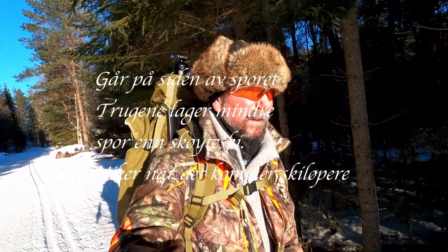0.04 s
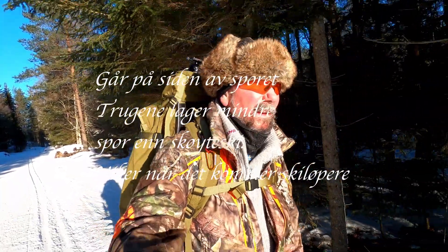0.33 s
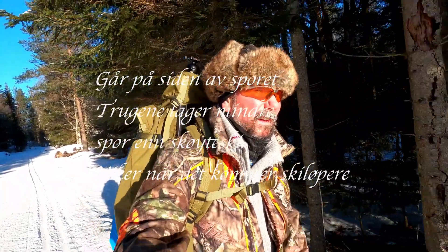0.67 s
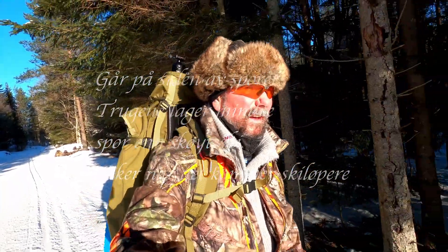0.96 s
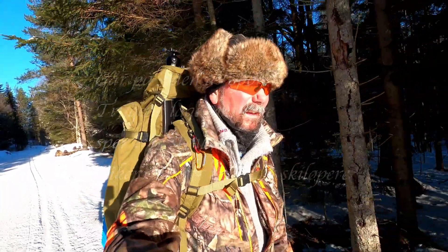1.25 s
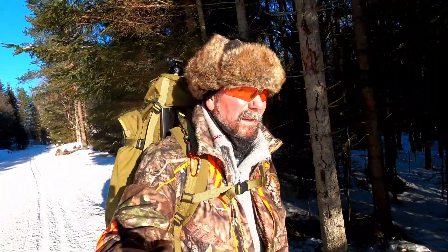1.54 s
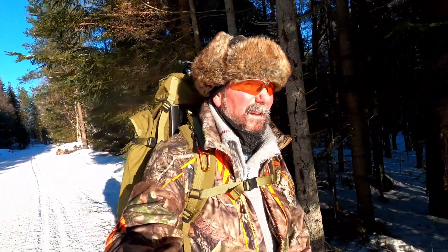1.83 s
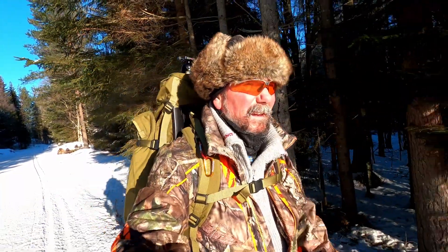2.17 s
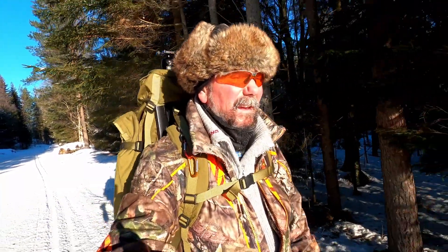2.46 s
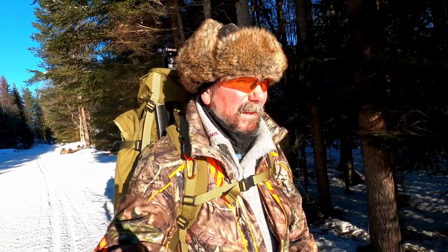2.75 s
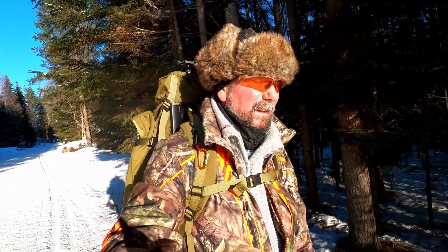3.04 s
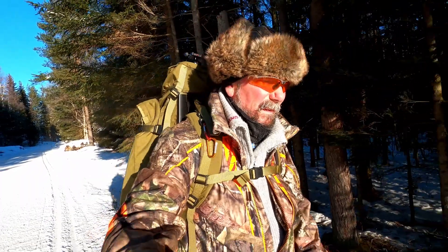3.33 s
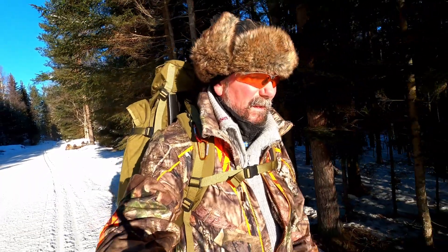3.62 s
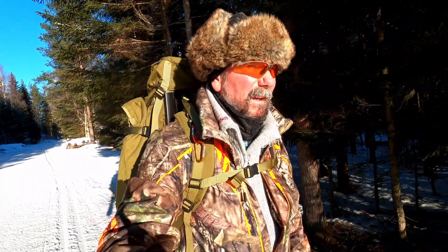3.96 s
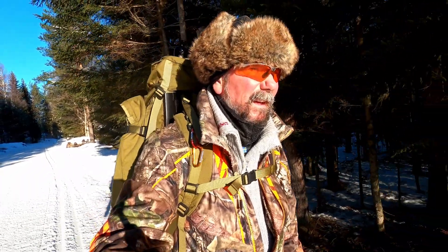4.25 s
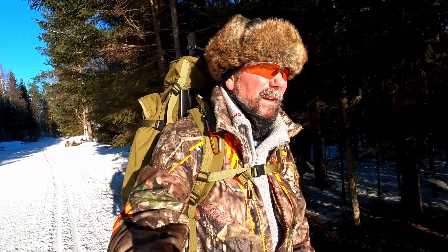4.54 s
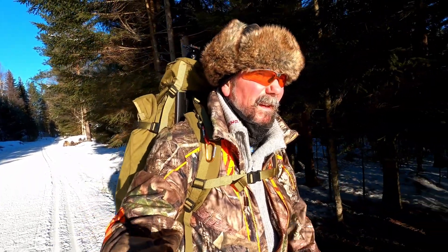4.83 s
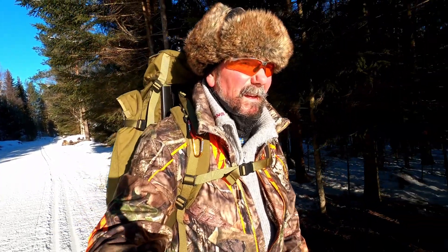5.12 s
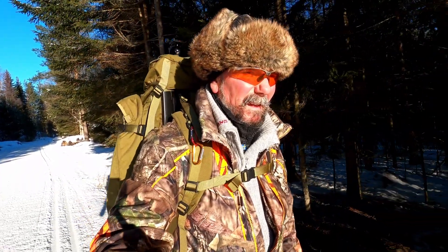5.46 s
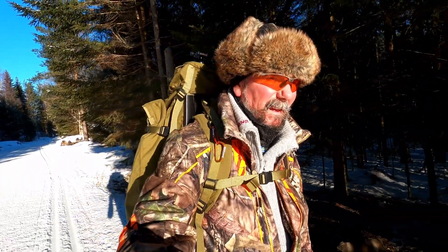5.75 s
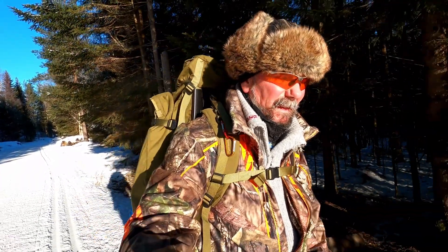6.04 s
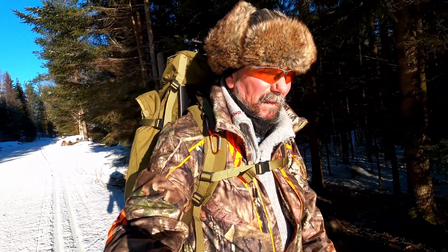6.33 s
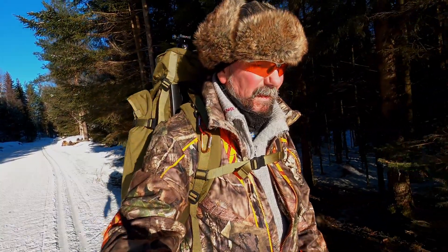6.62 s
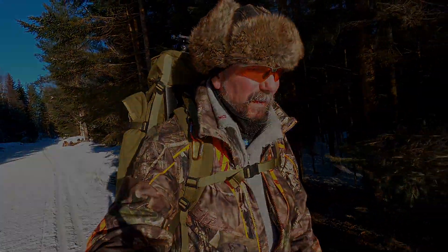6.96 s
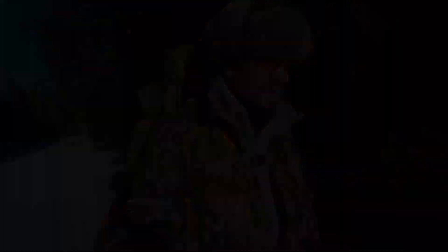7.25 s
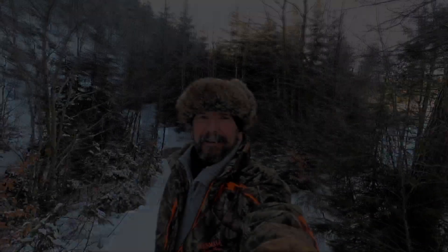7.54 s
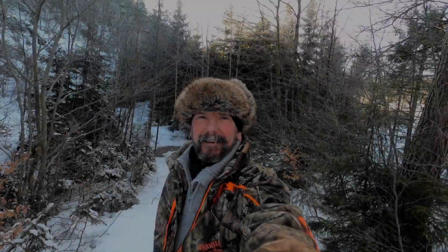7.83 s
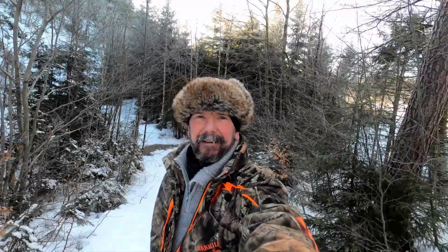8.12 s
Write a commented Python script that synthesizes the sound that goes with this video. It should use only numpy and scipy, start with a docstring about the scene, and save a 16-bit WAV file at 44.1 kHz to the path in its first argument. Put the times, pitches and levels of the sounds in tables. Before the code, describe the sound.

From the start, snowshoes walk over crusted snow in a still forest, about an arm's length below the microphone, with no echo. The steps are even, about one every 0.7 seconds. Each scrapes forward with an icy rasp, snaps the crust, then crushes the snow with a duller crunch that briefly rings the snowshoe frame. Lighter scuffs and brittle ticks fall between the steps. A metal binding clinks lightly at about 0.6, 0.7 and 5 seconds. Powder swishes faintly near 1.3 and 4.7 seconds, and the crust gives short, hollow creaks around 1.5, 2.4, 3.8 and 6.5 seconds. Soft, low puffs of air bump the microphone in the first three seconds and again from about 5.7 to 7.1 seconds. At about 7.4 seconds the walking cuts off abruptly, leaving only a very faint forest hush until the end at around 8 seconds.

```python
"""In the faint hush of a still forest, snowshoes walk on crusted snow an arm's length below a microphone. Each
shoe first scrapes forward and cracks the crust, then crushes the snow as the walker's weight comes on; these
brittle fractures set its frame ringing briefly. Along the way puffs of air bump the microphone, a binding
clinks, a sleeve swishes and slabs of crust croak over softer snow. After about 7.4 s the walk cuts off abruptly
and only the hush remains."""
import sys
import numpy as np
from scipy import signal
from scipy.fft import rfft, irfft
from scipy.io import wavfile
from scipy.ndimage import uniform_filter1d

SR = 44100
rng = np.random.default_rng(int(sys.argv[2]) if len(sys.argv) > 2 else 0)


def transcribe(u):
    """Save the signal u as a 16-bit wav file named by the first command-line argument.

    u: samples, shape (n,) or (channels, n), limited to [-1, 1]; the rate is SR.
    q: integer samples, one column per channel.
    """
    v = np.clip(np.atleast_2d(u).T, -1, 1)
    q = np.round(v * 32767).astype(np.int16)
    wavfile.write(sys.argv[1], SR, q)


N = 361179
TIME = np.arange(N) / SR
CLOCK = np.arange(0, N / SR, .0005)  # coarse time in seconds, for envelopes
BITE_S = 0.016  # time to reach full contact
UNLOAD_DB_PER_S, SCUFF_DB_PER_S = 514, 544  # decay once a step or a scuff stops


def undb(db):
    """Amplitude ratio for a level in decibels."""
    return 10 ** (np.asarray(db) / 20)


def unit(x):
    """Normalisation to an rms of 1."""
    return x / np.sqrt(np.mean(x ** 2))


def band(x, lo_hz, hi_hz, order=2):
    """Butterworth band-pass filter."""
    edges = [lo_hz, min(hi_hz, SR / 2 - 1)]
    return signal.sosfilt(signal.butter(order, edges, "band", fs=SR, output="sos"), x)


def colour(x, points, size=4096):
    """Minimum-phase filter with the given (Hz, dB) outline; being causal, it keeps attacks sharp."""
    hz, db = np.transpose(points)
    grid_hz = np.maximum(np.fft.rfftfreq(size, 1 / SR), 1)
    gain = undb(np.interp(np.log(grid_hz), np.log(hz), db))
    cepstrum = irfft(np.log(gain))
    cepstrum[1:size // 2] *= 2  # fold onto positive time
    cepstrum[size // 2 + 1:] = 0
    impulse_response = irfft(np.exp(rfft(cepstrum)))
    return signal.fftconvolve(x, impulse_response[None], axes=1)[:, :N]


def resonance(x, hz, t60, spread, hold_s):
    """Forced response of a damped mode, gain 1 at its centre, whose pitch jumps at random every hold_s."""
    bend = rng.standard_normal(N)[(TIME / hold_s).astype(int)]
    phasor = np.exp(2j * np.pi * np.cumsum(hz * np.exp(spread * bend)) / SR)
    pole = np.exp(-np.log(1000) / (t60 * SR))
    return 2 * np.real(phasor * signal.lfilter([1 - pole], [1, -pole], x / phasor))


def contact(start_s, length_s, rise_s, fall_db_per_s):
    """Envelope of one touch: linear attack, hold and exponential release."""
    age = CLOCK - start_s
    return np.clip(age / rise_s, 0, 1) * undb(-fall_db_per_s * np.clip(age - length_s, 0, 1))


def hush(level_db=-69.5):
    """Far-off air in the trees: broadband noise, only partly coherent between the two channels."""
    # Spectrum of the quiet forest. Each row: frequency in Hz, relative level in dB.
    spectrum = [(30, -7.5), (90, -15), (190, -0.5), (650, -18.5), (1500, -23), (14000, -45)]
    air = rng.standard_normal(N) + 1.4 * rng.standard_normal((2, N))
    return unit(colour(air, spectrum)) * undb(level_db)


def gait(scuff_rise_s=0.019, crumble_db_per_s=288.5, settle_db_per_s=116.5):
    """Envelopes of scraping and of crushing; the contacts are incoherent sources, so their powers add."""
    # A shoe bites and takes the weight. Each row: start and length in seconds, then, in relative dB,
    # first scrape, crush at full weight, fall of the scrape over the step, settling afterwards.
    steps = [(0.144, 0.22, -22.5, -24, 6.5, -7), (0.878, 0.21, -25.5, -22.5, 2, -7.5),
             (1.476, 0.35, -31, -24, -3.5, -15), (2.214, 0.2, -25.5, -19.5, 2.5, -6.5),
             (2.955, 0.27, -21, -22.5, 8.5, -14), (3.598, 0.27, -25.5, -23, 8, -4),
             (4.336, 0.17, -18, -21.5, 16.5, -3), (4.975, 0.29, -26.5, -22, 7.5, -12),
             (5.679, 0.21, -21.5, -23, 10.5, -8), (6.351, 0.2, -31.5, -22.5, -2, -7),
             (7.09, 0.23, -18.5, -27.5, 16.5, -10.5)]
    # A lightly loaded shoe brushes the crust. Each row: start and length in seconds,
    # scrape and crush in relative dB.
    scuffs = [(0, 0.0031, -22, -46), (0.548, 0.042, -33.5, -46.5), (0.662, 0.018, -29.5, -36),
              (0.733, 0.075, -32, -26), (1.339, 0.035, -35, -67.5), (1.976, 0.089, -47.5, -43.5),
              (2.148, 0.036, -24, -40), (2.662, 0.21, -42, -51.5), (2.875, 0.074, -27.5, -37.5),
              (3.318, 0.25, -36, -45.5), (3.95, 0.16, -48.5, -77), (4.097, 0.026, -31, -46),
              (4.247, 0.064, -25, -51), (4.663, 0.11, -36, -54), (4.795, 0.16, -33.5, -34.5),
              (5.531, 0.047, -35.5, -34), (6.042, 0.069, -32.5, -42.5), (6.188, 0.1, -42, -40.5),
              (6.313, 0.044, -39.5, -37), (6.732, 0.038, -39.5, -47), (6.904, 0.034, -29.5, -30.5),
              (7.045, 0.22, -41.5, -25.5)]
    scrape_power, crush_power = undb(-70) ** 2, undb(-64) ** 2  # stirring under the standing foot
    for start, length_s, scrape_db, crush_db, fall_db, settle_db in steps:
        progress = np.clip((CLOCK - start) / length_s, 0, 1)
        load = contact(start, length_s, BITE_S, UNLOAD_DB_PER_S)
        settling = undb(settle_db) * contact(start, length_s, BITE_S, settle_db_per_s)
        sliding = undb(scrape_db - fall_db * progress)
        weight = undb(crush_db - 6.5 * (1 - progress) ** 1.7)
        scrape_power += (np.maximum(load, settling * undb(2)) * sliding) ** 2
        crush_power += (np.maximum(load, settling) * weight) ** 2
    for start, length_s, scrape_db, crush_db in scuffs:  # the rasp stops sooner than the crumbling
        scrape_power += (contact(start, length_s, scuff_rise_s, SCUFF_DB_PER_S) * undb(scrape_db)) ** 2
        crush_power += (contact(start, length_s, scuff_rise_s, crumble_db_per_s) * undb(crush_db)) ** 2
    return np.interp(TIME, CLOCK, np.sqrt(scrape_power)), np.interp(TIME, CLOCK, np.sqrt(crush_power))


def jerks(rate, fade_s, depth):
    """Shot noise as a gain: random jumps that relax exponentially, as when a shoe slips or snow caves."""
    jumps = (rng.random(N) < rate / SR) * rng.exponential(size=N)
    relaxing = signal.lfilter([1], [1, -np.exp(-1 / (fade_s * SR))], jumps)
    return unit(np.sqrt(1 + depth * relaxing))


def fractures(rate, scatter_db, slip_s, lo_hz, hi_hz, lag_s, even_s, snaps):
    """Acoustic emission: ice bonds snap in avalanches, each of its own size, length, pitch and bearing."""
    when, pitch, phase = rng.random((int(rate * N / SR), 3)).T[:, :, None]
    size, length, bearing = rng.standard_normal((len(when), 3)).T[:, :, None]
    delay = slip_s * np.exp(length / 2) * rng.exponential(size=(len(when), snaps))
    chip_hz = lo_hz * (hi_hz / lo_hz) ** pitch
    swing = np.sin(2 * np.pi * (chip_hz * delay + phase))  # snaps swing with their chip of crust
    push = undb(scatter_db * np.minimum(size, 2)) * swing
    lag = lag_s * (1 + bearing)  # travel time between the two microphone ports
    oversample, ports = 4, []
    for side in (1, -1):
        arrival_s = when * N / SR + delay + side * lag / 2
        slots = np.abs(arrival_s * SR * oversample).astype(int).ravel()
        ports.append(np.bincount(slots, push.ravel(), N * oversample)[:N * oversample])
    crackle = signal.resample_poly(ports, 1, oversample, axis=1)
    # the foot feeds in energy steadily: a large break leaves a lull around it
    span = int(even_s * SR)
    power = uniform_filter1d(uniform_filter1d(np.mean(crackle ** 2, axis=0), span), span)
    return crackle / np.sqrt(np.abs(power) + power.mean() / 20)


def scrape(force, light_db=-34, shard_db=-13):
    """Friction breaks surface ice finely: a rasp coloured by resonant plates of crust; lone shards tick."""
    # Spectrum of scraped ice. Each row: frequency in Hz, relative level in dB.
    spectrum = [(100, -29), (330, -4.5), (800, -9.5), (960, -3.5), (2000, -0.5), (5000, -7), (7800, -15),
                (15500, -40)]
    rasp = fractures(rate=1300, scatter_db=4.5, slip_s=.0022, lo_hz=955, hi_hz=5500,
                     lag_s=1.6e-5, even_s=.05, snaps=30)
    shards = fractures(rate=55, scatter_db=5.0, slip_s=.001, lo_hz=900, hi_hz=4500,
                       lag_s=1.5e-5, even_s=.2, snaps=24)
    plates = resonance(rasp, hz=2300, t60=.007, spread=.3, hold_s=.035)
    grit = colour(rasp + plates, spectrum)
    # crystals and shards break under the lightest touch, so a light scrape is brighter and ticks more
    load = force / undb(light_db)
    crystals = band(grit, 2100, 13000, order=1) * load ** (2 / 3)
    ticking = undb(shard_db) * colour(shards, spectrum) * np.sqrt(load) * 2
    scraped = grit * force + (crystals + ticking) * undb(light_db)
    return scraped / band(grit, 1800, 8000).std() * undb(-3.5)


def crush(force):
    """Compaction packs fractures close together: a dull crunch, each clod creaking at its own pitch."""
    # Spectrum of packing snow. Each row: frequency in Hz, relative level in dB.
    spectrum = [(30, -16.5), (100, -1), (170, 0.5), (450, -0.5), (820, -2.5), (1100, 0), (1800, 0.5),
                (3500, -5), (12000, -60.5)]
    grains = fractures(rate=850, scatter_db=4.0, slip_s=.002, lo_hz=158, hi_hz=2012,
                       lag_s=3.5e-5, even_s=.03, snaps=14)
    creak = resonance(grains, hz=900, t60=.012, spread=.5, hold_s=.02)
    crunch = colour(grains + 2 * creak, spectrum)
    return crunch / band(crunch, 150, 800).std() * force * undb(-4.5)


def frame(drive):
    """Forced vibration: everything under the shoe rings its frame, whose modes shift as it flexes."""
    # Modes of frame and deck. Each row: frequency in Hz, gain over the direct sound in dB, T60 in seconds.
    modes = [(205, -7.5, .06), (312, -4, .13), (670, -10, .08), (935, -4, .04), (1210, -6, .04),
             (2100, -9, .06)]
    return drive + sum(undb(db) * resonance(drive, hz, t60, spread=0.059, hold_s=.07)
                       for hz, db, t60 in modes)


def crack(hz, length_s, width=1.644):
    """Brittle fracture: a burst rings the slab, with a sharp edge, a thud and a trickle of crumbs."""
    t = TIME[:SR // 10]
    crumbs = undb(-22) * np.exp(-t / 0.0071)
    decay = np.exp(-(t / length_s) ** 2 / 2) + crumbs
    attack = 1 - np.exp(-4 * t / length_s)  # a long break takes longer to build
    burst = rng.choice([-1, 1], len(t)) * decay * attack
    slab = unit(band(burst, hz / width, hz * width))
    ring = unit(np.sin(2 * np.pi * hz * t) * t * np.exp(-hz * t)) * min(0.0026 / length_s, 1)
    upper = band(burst, hz, hz * 3, order=1)
    edge = unit(band(upper, hz / 2, 5070)) * min(hz / 1350, 1) ** 2  # low knocks are dull
    thud = unit(band(burst, 257, 480)) * min(1100 / hz, 1) ** 2  # big, low slabs shift more snow
    snap = slab + undb(-1) * ring + undb(-5) * edge + undb(-7) * thud
    return snap * np.sqrt(SR / 100 / np.sum(snap ** 2))  # the energy of 10 ms at rms 1


def cracks():
    """Superposition of all the breaks; each reaches the left port one sample after the right."""
    # The crust snaps or the shoe knocks on it.
    # Each row: start in seconds, level in dB, pitch in Hz, length in seconds.
    breaks = [(0.042, -43.5, 1900, 0.0023), (0.088, -35, 1580, 0.0018), (0.132, -27.5, 1620, 0.006),
              (0.158, -22.5, 1200, 0.0046), (0.274, -20.5, 795, 0.0063), (0.476, -21.5, 1000, 0.0023),
              (0.564, -28.5, 2460, 0.004), (0.681, -25, 3430, 0.0061), (0.731, -22, 1180, 0.0055),
              (0.748, -20.5, 1700, 0.00086), (0.848, -25.5, 1730, 0.0033), (0.855, -21, 1210, 0.008),
              (1.132, -23, 1660, 0.0056), (1.147, -18, 960, 0.011), (1.252, -19, 1103, 0.002),
              (1.479, -24, 2960, 0.01), (1.495, -19.5, 1700, 0.0027), (1.526, -24, 1130, 0.0014),
              (1.604, -16, 1150, 0.003), (1.655, -18.5, 1170, 0.0037), (1.998, -28, 2790, 0.0065),
              (2.225, -22.5, 1360, 0.002), (2.486, -23, 834, 0.0015), (2.522, -24.5, 870, 0.0019),
              (2.745, -27, 2500, 0.0059), (2.842, -25, 2250, 0.012), (3.276, -35.5, 1590, 0.0018),
              (3.465, -28.5, 2150, 0.004), (3.591, -25.5, 2440, 0.0054), (4.097, -26.5, 2710, 0.0066),
              (4.209, -39.5, 1760, 0.0016), (4.251, -28.5, 2220, 0.0033), (4.322, -20.5, 970, 0.00082),
              (4.541, -17.5, 1080, 0.0071), (4.626, -22, 1050, 0.003), (4.682, -28.5, 1640, 0.001),
              (4.766, -33.5, 1160, 0.0023), (4.814, -26, 1340, 0.0065), (4.877, -26, 990, 0.0032),
              (4.97, -24.5, 2130, .002), (4.985, -22.5, 2330, 0.002), (5.262, -26.5, 1500, 0.0033),
              (5.307, -19.5, 1100, 0.0057), (5.509, -30.5, 2100, 0.0035), (5.544, -23.5, 2280, 0.0038),
              (5.655, -17, 1320, 0.012), (5.688, -21, 1600, 0.0028), (5.836, -21.5, 1330, 0.004),
              (5.907, -19, 1100, 0.013), (6.227, -21.5, 2050, 0.006), (6.246, -22, 1210, 0.0064),
              (6.324, -28.5, 1900, 0.0023), (6.36, -19, 1350, 0.0062), (6.518, -21, 598, 0.0078),
              (6.596, -33, 1000, .002), (6.609, -23, 720, 0.014), (6.639, -26, 920, 0.0057),
              (6.755, -30.5, 2270, 0.0069), (6.925, -25, 1950, 0.0044), (7.036, -22, 1270, 0.0044),
              (7.057, -24.5, 1100, 0.0027), (7.1, -19, 1560, 0.035), (7.322, -28, 1900, 0.0018),
              (7.385, -34, 2380, 0.0029)]
    track = np.zeros(N + SR)
    for start_s, db, hz, length_s in breaks:
        snap, start = crack(hz, length_s), int(start_s * SR)
        track[start:start + len(snap)] += undb(db) * snap
    return np.array([np.roll(track, 1), track])[:, :N]


def wind(crushing, stride_db=-19, puff_s=.019):
    """Turbulent pressure from strides and puffs: eddies bump the ports, both together and each alone."""
    # Puffs of air on the microphone. Each row: time of the peak in seconds, level in dB.
    puff_peaks = [(.49, -33.5), (1.16, -33), (1.94, -37), (2.04, -41.5), (2.145, -36), (2.592, -38),
                  (5.71, -29.5), (6.235, -31), (6.41, -31.5), (6.53, -31), (6.754, -30), (7.14, -31)]
    stride = undb(stride_db) * uniform_filter1d(crushing, SR // 4) * jerks(rate=10, fade_s=.02, depth=6)
    puffs = sum(undb(db) * np.exp(-((TIME - peak_s) / puff_s) ** 2 / 2) for peak_s, db in puff_peaks)
    shared = unit(band(rng.standard_normal(N), 25, 100))
    separate = unit(band(rng.standard_normal((2, N)), 14, 66))
    return unit(shared + separate) * (stride + puffs)


def clinks(reach=0.66):
    """Free vibration of the struck metal binding; each blow favours the modes near its own pitch."""
    # Blows on the binding. Each row: start in seconds, level in dB, pitch in Hz.
    blows = [(0.565, -27.5, 2550), (0.682, -27, 4240), (4.985, -28.5, 4800)]
    # Modes of the metal. Each row: frequency in Hz, T60 in seconds.
    modes = [(2590, .05), (3190, .04), (3570, .045), (4890, .06)]
    track, t = np.zeros(N + SR), TIME[:SR // 5]
    for start_s, db, pitch_hz in blows:
        ring, start = 0, int(start_s * SR)
        for hz, t60 in modes:
            excitation = np.exp(-np.abs(np.log(hz / pitch_hz)) / reach)
            ring += excitation * np.sin(2 * np.pi * hz * t) * np.exp(-np.log(1000) * t / t60)
        track[start:start + len(t)] += undb(db) * ring / ring[:SR // 100].std()
    return track[:N]


def swishes():
    """Sliding friction: a sleeve brushes the walker's clothing in a short band of high noise."""
    # Brushes of the sleeve. Each row: start in seconds, length in seconds, level in dB.
    brushes = [(1.343, 0.03, -44), (4.693, 0.026, -35)]
    level = sum(undb(db) * contact(start, length_s, BITE_S, SCUFF_DB_PER_S)
                for start, length_s, db in brushes)
    noise = rng.standard_normal(N) + rng.standard_normal((2, N)) / 2
    powder = unit(band(noise, lo_hz=5200, hi_hz=8300, order=3))
    return powder * np.interp(TIME, CLOCK, level)


def hollows(width=1.27):
    """Plate resonance: crumbling rings crust that bridges softer snow; a larger slab croaks lower."""
    # Slabs that creak or give way. Each row: start and length in seconds, level in dB, pitch in Hz.
    slabs = [(1.496, 0.33, -30, 1090), (1.417, 0.015, -38, 1440), (1.881, 0.016, -32.5, 1810),
             (2.355, 0.062, -21.5, 950), (3.82, 0.031, -24, 418), (6.485, 0.071, -26.5, 210),
             (7.171, 0.03, -24.5, 1196)]
    track = np.zeros(N)
    for start, length_s, db, hz in slabs:
        croak = unit(band(rng.standard_normal(N), hz / width, hz * width))
        envelope = contact(start, length_s, BITE_S, UNLOAD_DB_PER_S)
        track += undb(db) * croak * np.interp(TIME, CLOCK, envelope)
    return track


def scene(cut_s=7.413):
    """Free-field sum, since snow absorbs all echoes; the right port hears a little more treble."""
    scraping, crushing = gait()
    slips = jerks(rate=25, fade_s=0.014, depth=1.0)
    collapses = jerks(rate=50, fade_s=.01, depth=2.5)
    snow = (crush(crushing) + hollows()) * collapses + scrape(scraping * slips)
    shoes = frame(snow + cracks()) + clinks() + swishes()
    treble = band(shoes, 2100, 12000)
    shoes = shoes * np.array([[.98], [1.02]]) + treble * np.array([[-.11], [.2]])
    return (shoes + wind(crushing)) * (TIME < cut_s) + hush()


def record(dry, ceiling=.7, top_hz=15500):
    """Soft saturation rounds the highest peaks, and a steep low-pass filter cuts the top."""
    rounded = ceiling * np.tanh(dry / ceiling)
    return signal.sosfilt(signal.ellip(8, .2, 70, top_hz, fs=SR, output="sos"), rounded)


dry = scene()
out = record(dry)
transcribe(out)
```